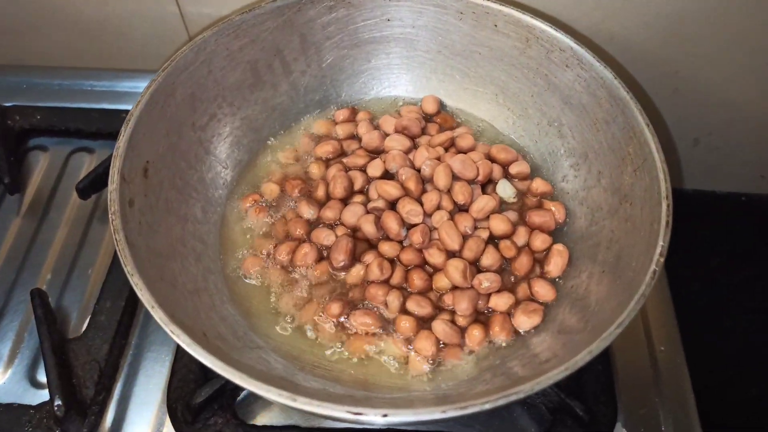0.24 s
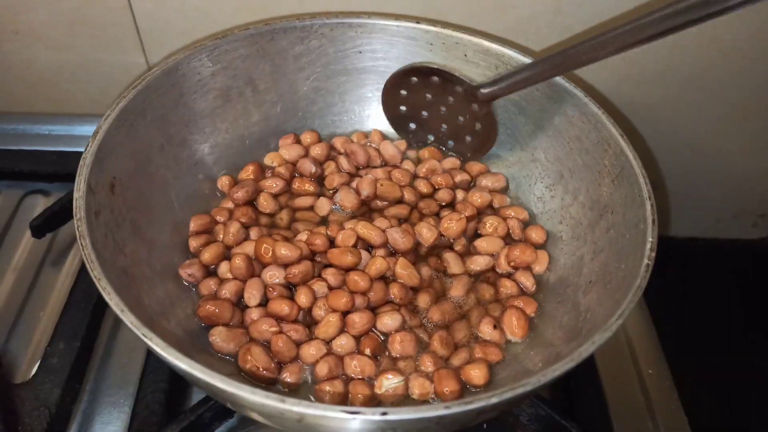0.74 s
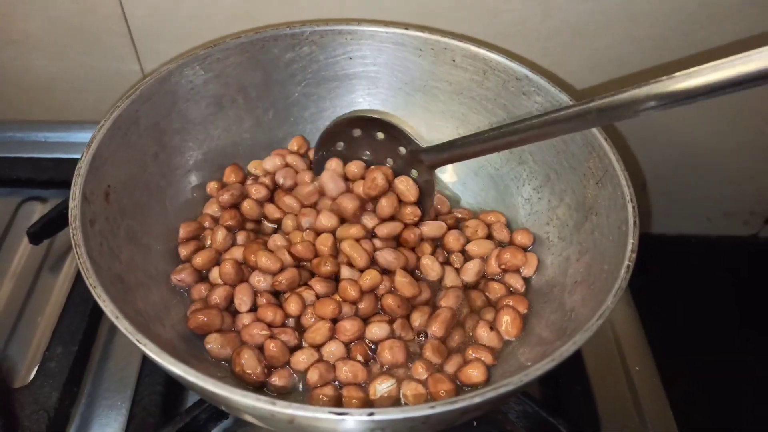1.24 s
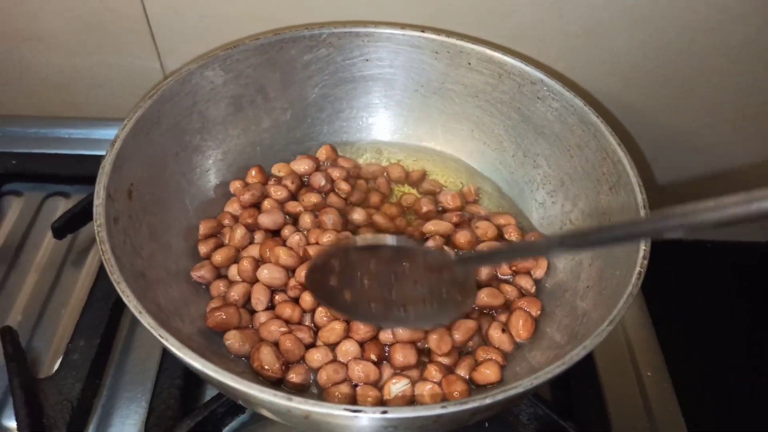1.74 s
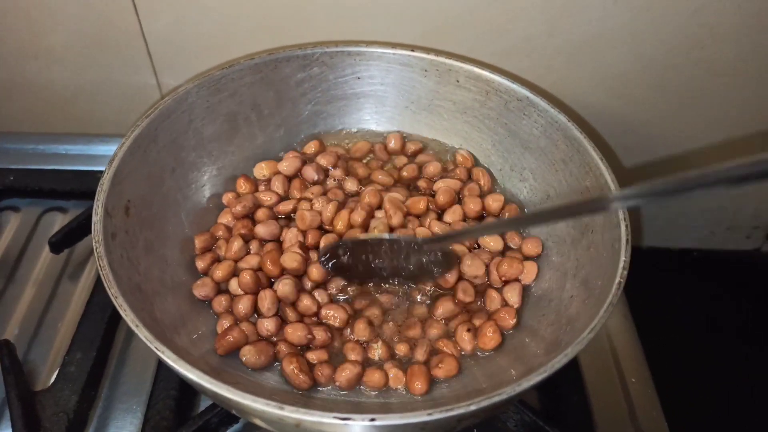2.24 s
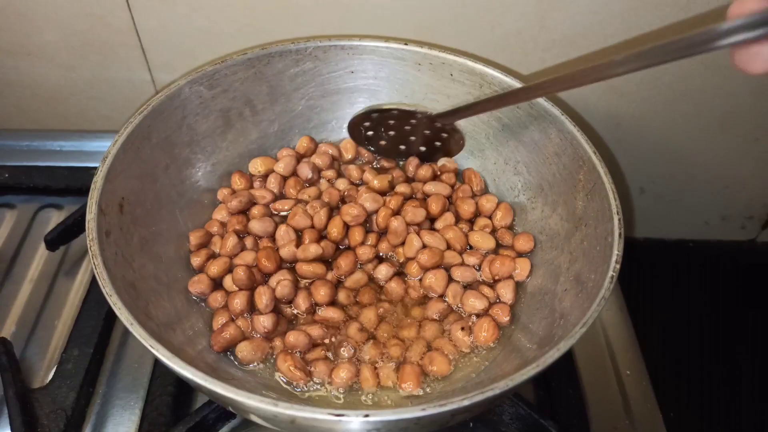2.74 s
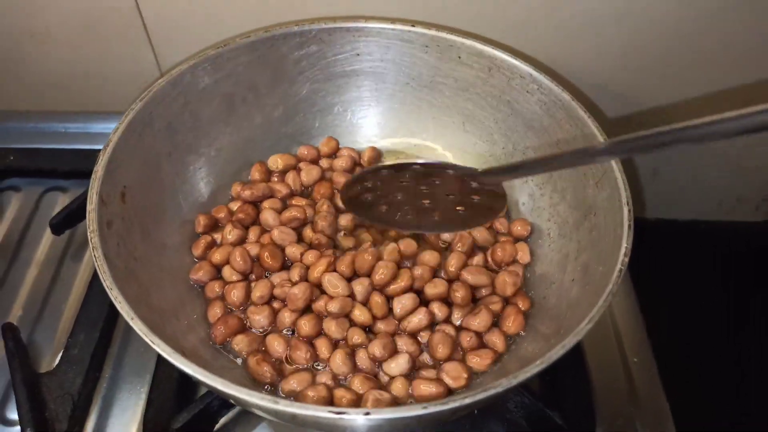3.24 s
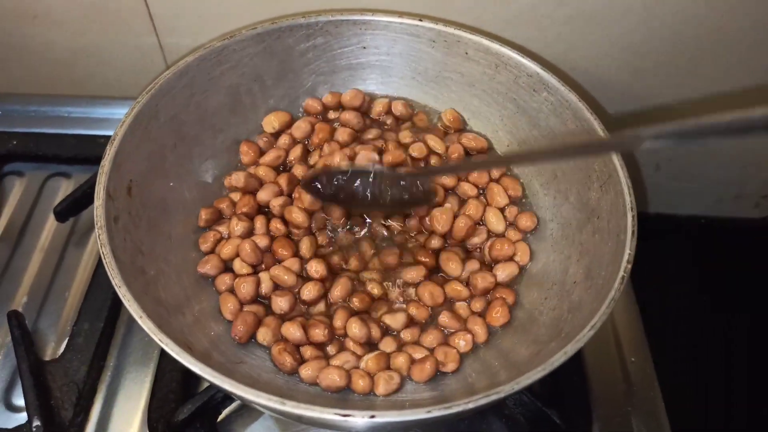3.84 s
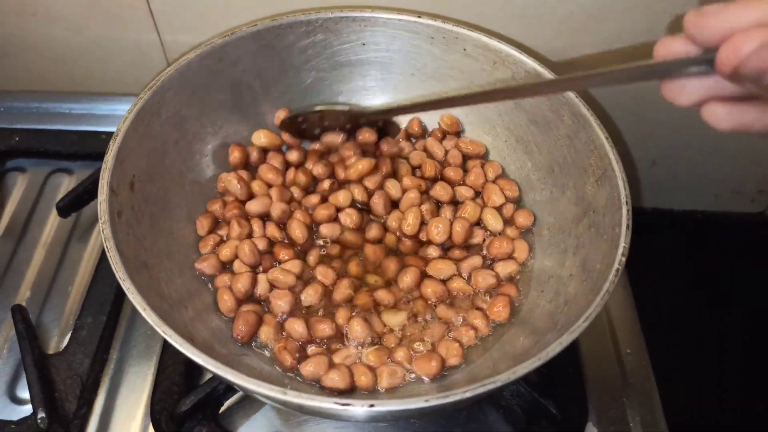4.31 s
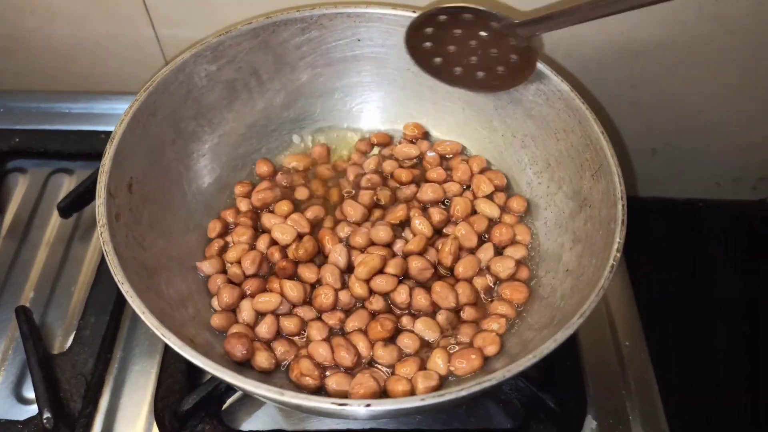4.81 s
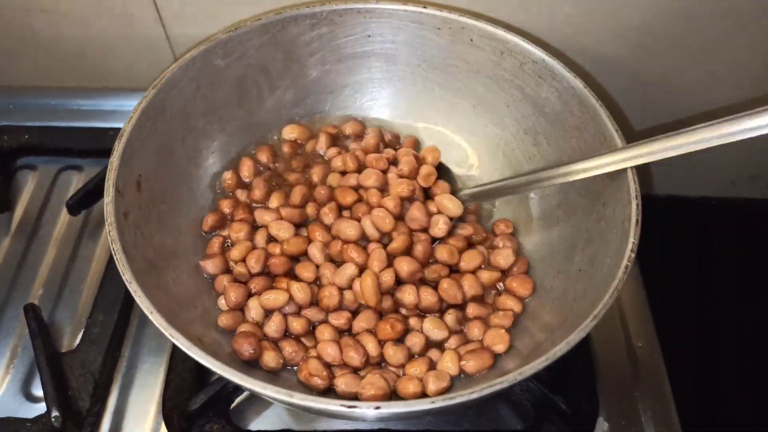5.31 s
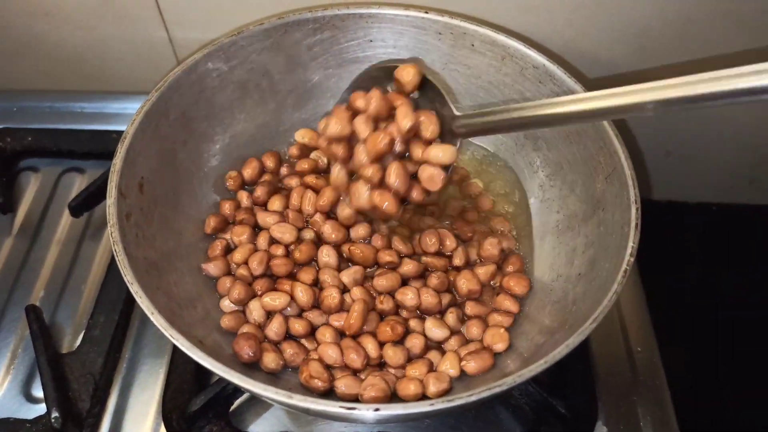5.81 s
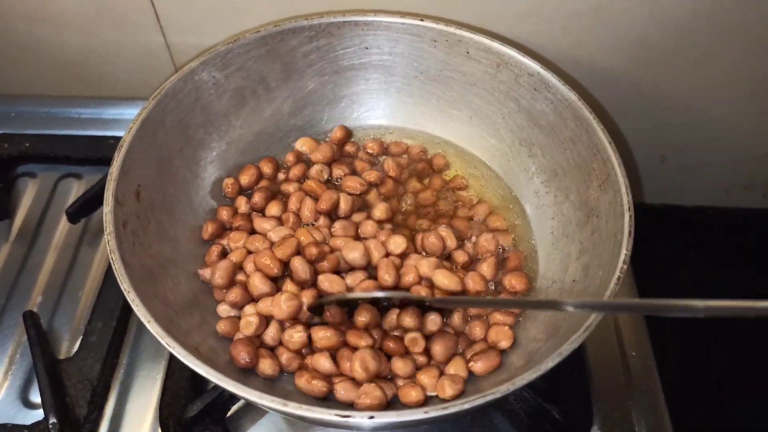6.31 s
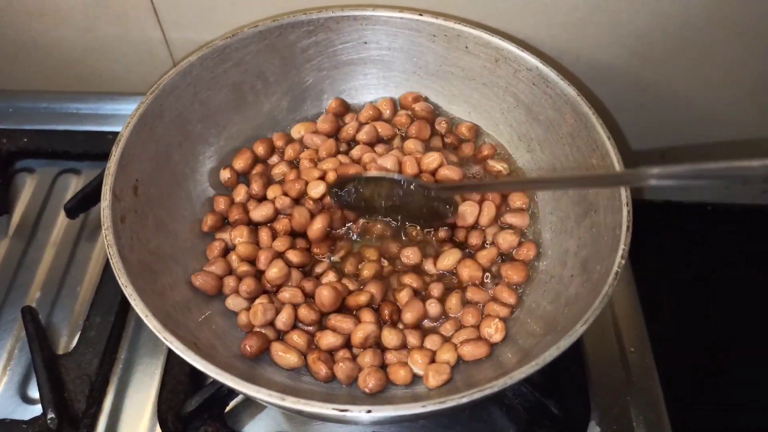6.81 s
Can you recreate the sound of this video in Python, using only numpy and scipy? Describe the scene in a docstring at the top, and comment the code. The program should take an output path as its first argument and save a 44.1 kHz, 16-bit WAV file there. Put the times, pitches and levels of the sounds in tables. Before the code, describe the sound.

Peanuts fry in hot oil with a soft sizzle and tiny pops over the low roar of a gas burner. The sound cuts out briefly near the start and fades back in. A steel spoon then knocks the thick metal pan at irregular intervals, making it ring briefly and the nuts rattle, and scrapes through them in short strokes. The pan is close, with a short kitchen echo.

```python
"""Peanuts frying in a pan

Tiny steam bubbles sizzle and pop in hot oil over the low roar of a burner. A steel spoon knocks
the thick metal pan, so both ring and the nuts rattle, and it scrapes through the nuts.
The pan is close, with a short kitchen echo. Early on, the sound cuts out and fades back in."""
import sys
import numpy as np
from scipy import signal
from scipy.fft import rfft, irfft, next_fast_len
from scipy.io import wavfile
from scipy.ndimage import uniform_filter1d

SR = 44100
rng = np.random.default_rng(int(sys.argv[2]) if len(sys.argv) > 2 else 0)


def dump(signal):
    """Clip the signal to [-1, 1] and save it as 16-bit WAV at the path in sys.argv[1]."""
    limited = np.clip(np.atleast_2d(signal).T, -1, 1)
    pcm = np.round(limited * 32767).astype(np.int16)
    wavfile.write(sys.argv[1], SR, pcm)


N = 310987

# How loud the oil sizzles. Each row: time in seconds, level in dB.
SIZZLE_LEVELS = [(0, -53), (.33, -53.5), (.4, -56.5), (1.2, -55.5), (3.6, -54), (6.2, -54), (7.05, -53.5)]
# Pops of oil and clicks of nuts. Each row: start in seconds, ring in dB, pitch in Hz, spit in dB.
POP_EVENTS = [(0.774, -45, 7000, -42), (1.414, -46, 13100, -60), (1.527, -62, 13000, -47),
              (2.172, -48, 6200, -45), (2.389, -57, 6600, -34), (2.61, -63, 13000, -40),
              (2.759, -47.5, 6570, -50), (3.22, -63, 7050, -45), (3.389, -49, 4500, -45),
              (3.94, -62, 6960, -44), (3.971, -57, 6800, -55), (4.105, -60, 9100, -48),
              (4.117, -60, 9000, -46), (4.552, -38, 14200, -41), (5.192, -47, 3040, -53),
              (5.281, -43, 4450, -40), (5.691, -54, 3240, -62), (5.739, -44.5, 1030, -49),
              (5.77, -58, 7000, -49), (5.891, -21.5, 1464, -53), (5.972, -36, 1040, -45),
              (6.021, -43, 1200, -59), (6.391, -32.5, 1070, -53), (6.889, -43, 1080, -51)]
# Spoon knocks. Each row: start in seconds, crack in dB, its top in Hz, depth (0 bare metal, 1 buried in
# nuts), clank in Hz and in dB, pan ring in dB, place (0 low wall, 1 rim), boosted pitch in Hz,
# then the boost, bowl ring, spoon ring and nut rattle in dB.
SPOON_KNOCKS = [(0.7242, -12, 15900, 0.05, 7650, -25, -46, 0.17, 13600, 8.5, -38, -41.5, -38.5),
                (2.007, -24.5, 9300, 0.89, 3660, -25.5, -64, .5, 4474, 0, -53, -38.5, -34),
                (2.679, -28, 16000, .1, 7100, -35, -48.5, 0.46, 2340, 12, -32.5, -46.5, -44),
                (3.6805, -20, 11000, 0.89, 3300, -20, -66, 0.95, 7400, 1, -38.5, -31, -30.5),
                (4.223, -20, 15800, 0.26, 7860, -29, -48, 0.22, 1800, 1.5, -40, -42.5, -44.5),
                (4.496, -23.5, 16000, 0.31, 3540, -33.5, -75, .3, 13060, 3, -79, -69, -43.5),
                (4.904, -27.5, 12000, 0.81, 6170, -25, -46, 0.82, 3350, 10, -26.5, -41, -41),
                (6.4346, -14, 9200, 0.71, 4470, -19, -58, 0.42, 4270, 0, -36.5, -29.5, -25.5)]
# The pan's upper tones. Each row: pitch in Hz, dB if hit low, dB if hit at the rim, free fade in seconds.
# A fade is the time to drop by 60 dB. A knock shortens the free fades.
PAN_TONES = [(844, 3, 5.5, 0.35), (925, 3, 5, 0.35), (1516, -9.5, -1.5, 0.29), (2380, -1, -7.5, 0.49),
             (2370, -35, -19, 0.24), (3340, -27.5, -8, 0.68), (4473, -0.5, 1.5, 0.21), (4494, 2, 3.5, 0.32),
             (5700, -13, 11, 0.21), (6430, 17, -8, 0.072), (7070, -12, 10, 0.23), (7610, 1, 12, 0.13),
             (7840, -6, -16, 0.24), (9700, 24, -7, 0.14), (10500, 4, 15, 0.22), (11200, 20, 13, .21),
             (12600, -7, -9, .19), (13800, 13, -7, .16), (14821, 2, -13, .1)]
# The lowest tones of the pan's whole bowl. Each row: pitch in Hz, level in dB, fade in seconds.
BOWL_TONES = [(331.6, 2, 0.31), (342.4, -3, 0.24), (336.4, -10, 0.91)]
# The spoon's tones, dulled by nuts and oil. Each row: pitch in Hz, level in dB, free fade in seconds.
SPOON_TONES = [(477.5, -2.5, 0.57), (832, -10.5, 0.096), (960, 5, 0.073), (1360, -31.5, 0.074),
               (1804, -35, 0.081), (2530, -32, 0.11), (3700, -19, 0.077), (3820, -3, 0.071)]
# The tone colour of a blow among the nuts. Each row: frequency in Hz, gain in dB.
HEAP_COLOUR = [(300, -0.5), (500, -6.5), (1000, 7), (1400, 0), (2100, -3), (3400, -1), (4400, 2.5),
               (5500, -7.5), (7600, 2), (9500, 1.5), (13000, 2)]
# Spoon drags. Each row: start, rise, hold and release in seconds, swell and scrape in dB,
# the hollow's first and last pitch in Hz, then hollow, metal and treble in dB.
SPOON_DRAGS = [(0.839, 0.052, 0.089, .05, 3.5, -56.5, 1870, 1830, -65, -56, -69),
               (.93, 0.045, .085, 0.017, 2, -55, 1617, 1490, -55.5, -67, -61),
               (1.757, 0.097, 0.13, .06, -2, -60, 945, 960, -73, -61.5, -74),
               (2.011, 0.028, 0.097, 0.086, 0.5, -50, 1060, 930, -44.5, -69, -58),
               (3.002, 0.064, 0.034, .12, 2, -61, 960, 900, -68, -61, -68),
               (4.961, 0.08, 0.045, 0.051, -5, -54, 2350, 2210, -65, -47, -38),
               (5.051, 0.025, 0.22, 0.045, -8.5, -48, 2300, 1360, -52, -55, -53.5),
               (5.301, 0.036, 0.089, .06, -3, -73, 1410, 1410, -76, -61, -72),
               (5.639, .06, 0.085, .06, -1, -70, 1800, 1730, -64, -69, -74),
               (5.881, .025, .02, .04, 1, -63, 1480, 1420, -53.5, -71, -64),
               (5.955, 0.02, 0.057, 0.12, -3, -55.5, 990, 820, -53.5, -70, -74),
               (6.35, 0.041, .17, 0.027, 2, -64, 1040, 980, -61, -52, -68),
               (6.529, 0.033, 0.088, .08, 0.5, -67, 980, 920, -60, -66, -75)]
# Where steel scraping the pan rings. Each row: pitch in Hz, width in Hz, gain in dB.
RASP_BANDS = [(340, 45, 17), (872, 110, 18), (3150, 52, -19), (3620, 220, -1), (4160, 170, 7.5),
              (4560, 150, -1), (6500, 360, -0.5), (7040, 340, -11)]
# The tone colour of the low roar. Each row: frequency in Hz, gain in dB.
ROAR_COLOUR = [(18, -82), (30, -44), (80, -5.5), (96, 1), (129, -11.5), (168, -4), (234, -15.5), (292, -5),
               (408, -9.5), (482, -10), (660, -14.5), (855, -10.5), (1090, -16.5), (1190, -17.5),
               (2500, -28.5), (3250, -99), (5500, -120)]
# Slight random drift in the level of the low roar. Each row: time in seconds, level in dB.
ROAR_DRIFT = [(0, -53), (1.3, -52.5), (2.0, -49.5), (2.5, -52.5), (3.2, -51), (4, -51.5), (4.8, -52),
              (7.05, -52.5)]
# Where the kitchen booms with the roar. Each row: pitch in Hz, width in Hz, level in dB.
ROOM_BOOMS = [(101.7, 9.7, -10.5), (151.5, 9.2, -11), (272.7, 8.2, -13), (285, 10, -16.5)]
# The microphone's uneven treble. Each row: frequency in Hz, gain in dB.
MIC_COLOUR = [(4700, -1), (4790, -6.5), (6000, -3.5), (6200, 4), (7650, 6.5), (7720, 1.5), (8480, 1.5),
              (8560, -11), (11500, -31.5), (11620, -8.5), (12850, -9), (12950, -7), (15440, -9.5),
              (15560, -33)]

# Each pair: on bare metal, buried in nuts. Tilts are in dB per octave.
CRACK_TILT, RATTLE_TILT = (7.5, -1.1), (0.5, -5)
RATTLE_FADE_S, FREE_RING_S = (0.15, 0.25), (0.16, 0.076)


def sizzle():
    """Tiny steam bubbles make a dense hiss, with short pitched bursts and bright spits on top."""
    hiss = tilted(patchy_noise(patchy_db=1.33, flicker_db=0.67), tilt=2.5, low_hz=940)
    bursts = np.zeros(N)
    for hz in np.geomspace(3500, 15000, num=14):
        t = np.arange(round(20 * SR / hz)) / SR  # twenty cycles
        ping = np.sin(2 * np.pi * hz * t) * np.exp(-t * hz / 5)
        bursts += signal.oaconvolve(clicks(N, per_s=12, spread_db=4), ping)[:N]
    spit = rng.standard_normal(200) * np.exp(-np.arange(200) / 30)
    spits = signal.oaconvolve(clicks(N, per_s=24, spread_db=2.3), spit)[:N]
    spits = tilted(spits, tilt=1.6, low_hz=4500)
    return level_curve(SIZZLE_LEVELS) * (hiss + gain(-18) * unit_level(bursts) + gain(-25) * spits)


def pop(ring_db, hz, spit_db, fade_s=0.026):
    """Oil pops or a nut clicks: one short ring and a spit of noise."""
    t = np.arange(4000) / SR
    tone = np.sin(2 * np.pi * hz * t) * (1 - np.exp(-t * hz / 0.5))
    spit = tilted(rng.standard_normal(len(t)), tilt=0.67, low_hz=0.87 * hz)
    return (gain(ring_db) * tone + gain(spit_db) * spit) * gain(-60 * t / fade_s)


def knock(crack_db, top_hz, depth, clank_hz, clank_db, pan_db, place, boost_hz, boost_db,
          bowl_db, spoon_db, rattle_db):
    """The spoon hits with a crack and a clank, pan and spoon ring, and the nuts rattle to rest."""
    t = np.arange(SR // 2) / SR
    at_depth = lambda pair: np.interp(depth, [0, 1], pair)
    crack_fade_s = 0.0065 * 2 ** (-crack_db / 11.5)  # softer blows last longer
    crack = tilted(rng.standard_normal(len(t)), at_depth(CRACK_TILT), 300, top_hz)
    crack = coloured(crack, HEAP_COLOUR) * gain(crack_db - 60 * t / crack_fade_s)
    crack *= 1 - np.exp(-t / 0.00023)
    cluster_hz = clank_hz * np.array([0.97, 1, 1.045])
    clank = ring(cluster_hz, clank_db + np.array([-8, 0, -9]), 0.9 * crack_fade_s, rise_cycles=1.3)
    fade_share = np.interp(place, [0, 1], [0.72, 0.91])  # rim hits ring longer
    pan = pan_ring(place, boost_hz, boost_db, fade_share)
    pan *= gain(pan_db + 1.9 * wobble(len(t), 0.016))
    bowl = gain(bowl_db) * ring(*np.transpose(BOWL_TONES), rise_cycles=5)
    hz, db, fade_s = np.transpose(SPOON_TONES)
    spoon = ring(hz, db, fade_s * fade_share, rise_cycles=0.81)
    spoon *= gain(spoon_db + 1.3 * wobble(len(t), 0.0034))  # touching nuts make it uneven
    choke = gain(-250 * np.maximum(t - at_depth(FREE_RING_S), 0))  # the spoon sinks in
    rattle = tilted(clicks(len(t), per_s=5000, spread_db=3.9), at_depth(RATTLE_TILT), 340, 11300)
    rattle = coloured(rattle, HEAP_COLOUR) * gain(rattle_db - 60 * t / at_depth(RATTLE_FADE_S))
    return crack + clank + bowl + (pan + spoon) * choke + rattle


def pan_ring(place, boost_hz, boost_db, fade_share):
    """Where the pan is hit sets the balance of its tones; those near one pitch get a boost."""
    hz, wall_db, rim_db, fade_s = np.transpose(PAN_TONES)
    db = wall_db + place * (rim_db - wall_db)
    db += boost_db * np.exp(-(np.log2(hz / boost_hz) / 0.69) ** 2)
    return ring(hz, db, fade_s * fade_share, rise_cycles=1.4)


def drag(rise, hold, release, swell_db, scrape_db, start_hz, end_hz, hollow_db, metal_db, treble_db):
    """The spoon catches and slips, sounding the pan and a hollow among the nuts whose pitch glides."""
    force = stroke(rise, hold, release, swell_db)
    glide = np.linspace(0, 1, len(force)) ** 0.59  # fastest at the start
    hollow_hz = start_hz * (end_hz / start_hz) ** glide
    slips = clicks(len(force), per_s=6000, spread_db=3.34) * gain(1.8 * wobble(len(force), 0.0074))
    scrape = gain(scrape_db) * tilted(slips, tilt=-5.5, low_hz=640, top_hz=5800)
    rasp = unit_level(sum(gain(db) * resonate(slips, hz, width) for hz, width, db in RASP_BANDS))
    hollow = unit_level(resonate(resonate(slips, hollow_hz, 340), hollow_hz, 340))
    overtone = unit_level(resonate(resonate(slips, 1.76 * hollow_hz, 500), 1.77 * hollow_hz, 500))
    metal = gain(metal_db) * (rasp + gain(-18) * overtone)
    treble = gain(treble_db) * tilted(slips, tilt=1.2, low_hz=6400)
    return force * (scrape + metal + gain(hollow_db) * hollow + treble)


def shove():
    """The heap of nuts slides low in the pan with a dull rumble."""
    force = stroke(rise=0.12, hold=0.03, release=0.12, swell_db=-4)
    rumble = resonate(rng.standard_normal(len(force)), hz=130, width_hz=110)
    rumble = resonate(rumble, hz=210, width_hz=340)
    return gain(-43.5) * force * unit_level(rumble)


def burner():
    """The flame gives a low roar that makes the kitchen boom. The level drifts slightly."""
    roar = unit_level(coloured(patchy_noise(patchy_db=0.5, flicker_db=0), ROAR_COLOUR))
    for hz, width, db in ROOM_BOOMS:
        roar += gain(db) * unit_level(resonate(rng.standard_normal(N), hz, width))
    return level_curve(ROAR_DRIFT) * unit_level(roar)


def kitchen_echo(x, fade_s=0.46):
    """Tiled walls send back many small echoes that quickly die away."""
    echoes = np.zeros(SR // 2)
    slots = np.arange(200, len(echoes) - 20, 20)
    echoes[slots + rng.integers(0, 20, len(slots))] = rng.choice([-1., 1.], len(slots))
    echoes *= gain(-60 * np.arange(len(echoes)) / SR / fade_s)
    return signal.oaconvolve(x, echoes / np.linalg.norm(echoes))[:N]


def stroke(rise, hold, release, swell_db, edge_db=-21.5):
    """The strength of one movement: it rises, swells or sags while held, and dies away."""
    corners = np.cumsum([0, rise, hold, release])
    t = np.arange(0, corners[-1], 1 / SR)
    return gain(np.interp(t, corners, [edge_db, 0, swell_db, swell_db + edge_db]))


def ring(hz, db, fade_s, rise_cycles):
    """Tones struck together: each swells briefly, then fades."""
    t = np.arange(SR // 2)[:, None] / SR
    rise = 1 - np.exp(-t * hz / rise_cycles)
    return (gain(db - 60 * t / fade_s) * rise * np.sin(2 * np.pi * hz * t)).sum(1)


def clicks(length, per_s, spread_db):
    """Random clicks, a few of them large."""
    happens = rng.random(length) < per_s / SR
    size = np.minimum(rng.exponential(1, length), 5)
    return happens * gain(spread_db * size) * rng.choice([-1., 1.], length)


def patchy_noise(patchy_db, flicker_db):
    """Noise whose level drifts in patches of time and pitch, and can flicker as a whole."""
    frames = N // 128 + 5
    real, imaginary, patches = rng.standard_normal((frames, 257, 3)).T
    patches = uniform_filter1d(patches, size=6, axis=0)
    patches = unit_level(uniform_filter1d(patches, size=20, axis=1))
    flicker = unit_level(uniform_filter1d(rng.standard_normal(frames), size=3))
    spectrum = (real + 1j * imaginary) * gain(patchy_db * patches + flicker_db * flicker)
    return signal.istft(spectrum, nperseg=512, noverlap=384)[1][:N]


def wobble(length, lump_s):
    """A smooth random curve with lumps about lump_s long."""
    size = round(lump_s * SR)
    return unit_level(uniform_filter1d(uniform_filter1d(rng.standard_normal(length), size), size))


def resonate(x, hz, width_hz):
    """Keeps a band around a steady or moving pitch: shift it to zero, smooth, shift back."""
    turn = np.exp(2j * np.pi * np.cumsum(hz * np.ones(len(x))) / SR)
    decay = np.exp(-np.pi * width_hz / SR)
    return 2 * (turn * signal.lfilter([1 - decay], [1, -decay], x / turn)).real


def tilted(x, tilt, low_hz, top_hz=20000):
    """Brightens or dulls x by tilt dB per octave, trims both ends and sets its level to 1."""
    def response(hz):
        edges = (1 + (low_hz / (hz + 1)) ** 8) * (1 + (hz / top_hz) ** 8)
        return tilt * np.log2((hz + 100) / 2000) - 10 * np.log10(edges)
    return unit_level(filtered(x, response))


def coloured(x, colour):
    """Filters x by a table of frequencies and gains."""
    points_hz, db = np.transpose(colour)
    return filtered(x, lambda hz: np.interp(np.log(hz + 1), np.log(points_hz + 1), db))


def filtered(x, db_of_hz):
    """Turns each frequency up or down."""
    size = next_fast_len(len(x))
    gains = gain(db_of_hz(np.fft.rfftfreq(size, 1 / SR)))
    return irfft(rfft(x, size) * gains, size)[:len(x)]


def level_curve(rows):
    """Joins timed levels into a gain for every sample."""
    return gain(np.interp(np.arange(N) / SR, *np.transpose(rows)))


def gain(db):
    return 10 ** (np.asarray(db) / 20)


def unit_level(x):
    return x / np.sqrt(np.mean(x ** 2) + 1e-20)


def add(mix, start_s, sound):
    part = mix[round(start_s * SR):][:len(sound)]
    part += sound[:len(part)]


def scene():
    """Knocks, pops and drags with their echo, plus burner, sizzle and one shove."""
    near = np.zeros(N)
    for source, table in ((knock, SPOON_KNOCKS), (pop, POP_EVENTS), (drag, SPOON_DRAGS)):
        for start_s, *settings in table:
            add(near, start_s, source(*settings))
    mix = near + gain(-14) * kitchen_echo(near) + burner() + sizzle()
    add(mix, start_s=1.78, sound=shove())
    return mix[None]


def record(dry):
    """A small microphone trims and colours the sound, which cuts out once and fades back in."""
    cut_s, back_s, fade_in_s, top_hz = 0.306, 0.36, 0.29, 16200
    bass_cut = signal.butter(3, 55, "high", fs=SR, output="sos")
    sound = gain(2.5) * coloured(signal.sosfilt(bass_cut, dry[0]), MIC_COLOUR)
    t = np.arange(N) / SR
    sound *= np.where(t < cut_s, 1, np.clip((t - back_s) / fade_in_s, 0, 1))
    treble_cut = signal.firwin(511, top_hz, window=("kaiser", 9), fs=SR)
    return signal.oaconvolve(sound, treble_cut, "same")[None]


dry = scene()
out = record(dry)
dump(out)
```